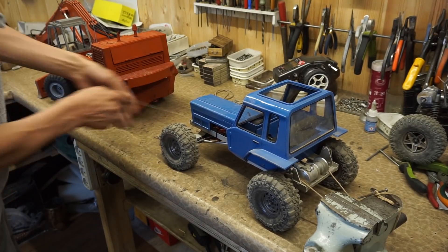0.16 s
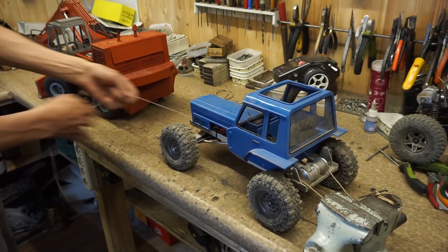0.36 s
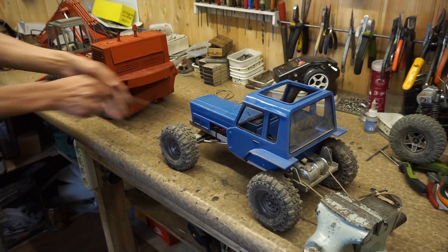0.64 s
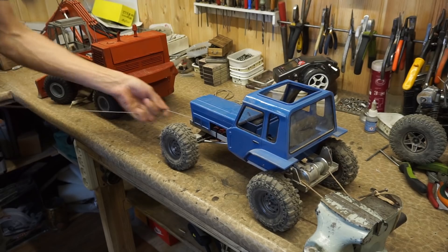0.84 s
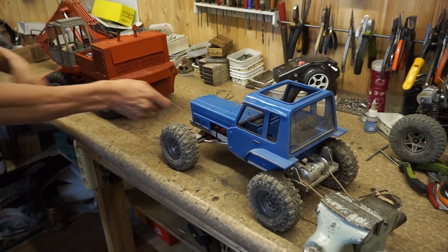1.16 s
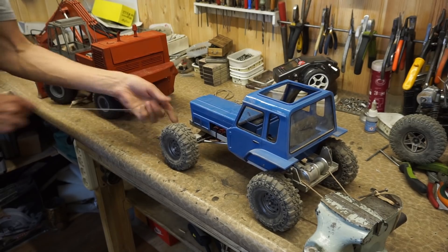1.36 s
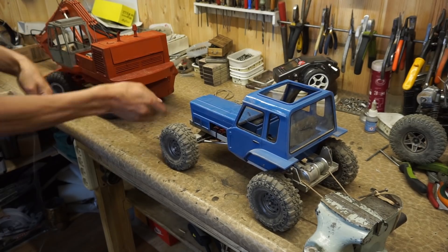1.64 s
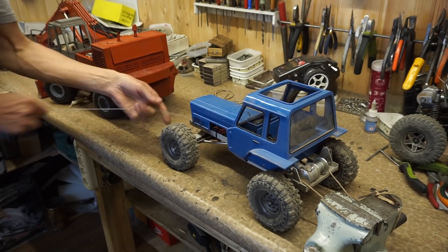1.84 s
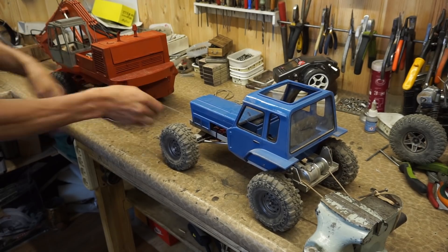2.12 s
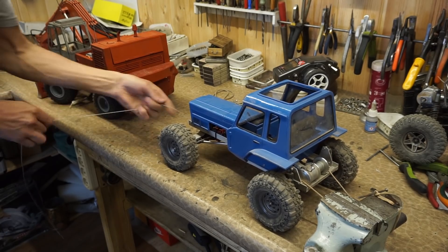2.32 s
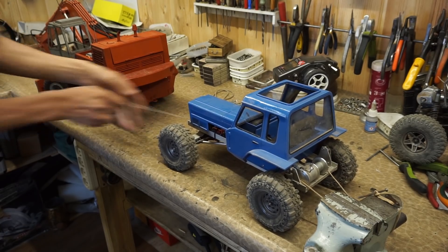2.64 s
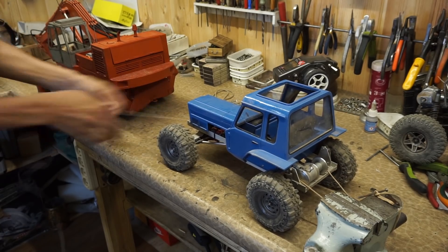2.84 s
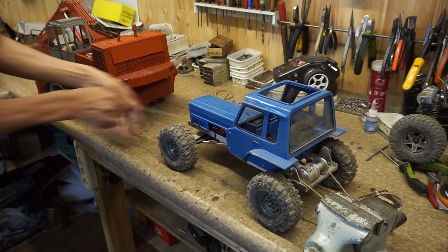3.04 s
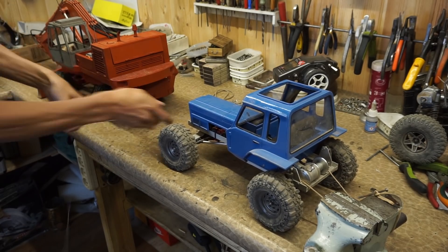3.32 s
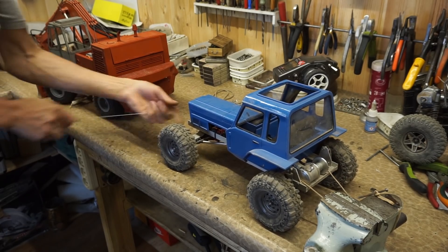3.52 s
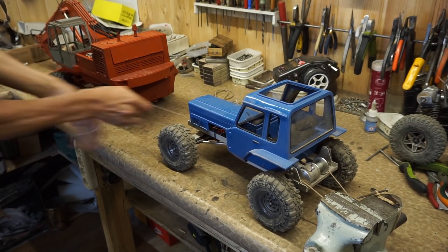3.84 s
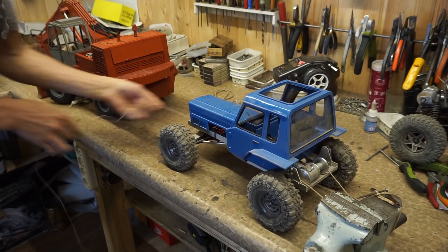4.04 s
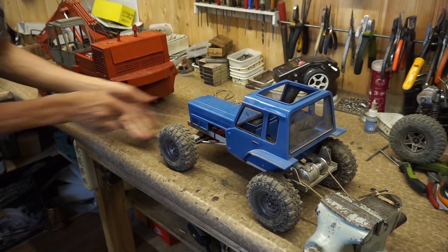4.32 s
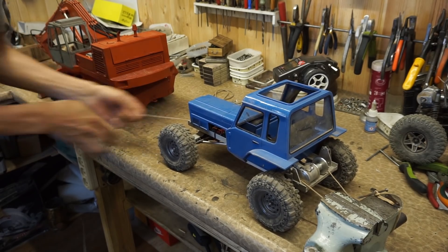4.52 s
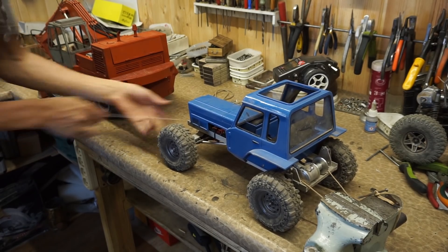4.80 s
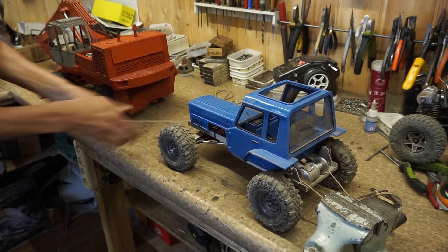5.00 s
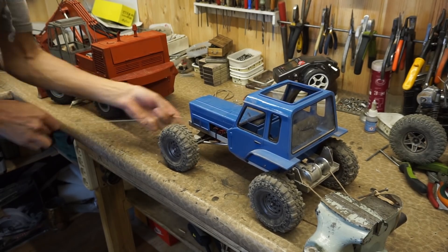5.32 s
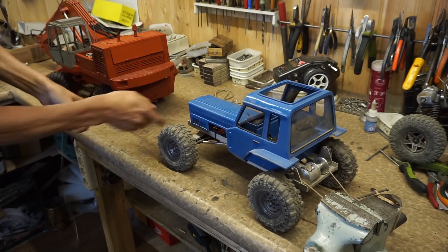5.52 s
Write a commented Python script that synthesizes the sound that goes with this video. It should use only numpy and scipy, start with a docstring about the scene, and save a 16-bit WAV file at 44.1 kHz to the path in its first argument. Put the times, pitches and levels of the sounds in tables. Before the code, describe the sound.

On a workbench in a small, quiet workshop, string is hauled hand over hand off the free-spinning drum of a model tractor's winch. From 0 to 1 s the pulls are hesitant and uneven: short, light rattles, two small ticks near 0.6 s, a faint hiss of string through fingers and thin high squeals around 0.8 s. From about 1 s the tugs get stronger and settle into a quick rhythm, roughly five a second, each a gritty whirr of bearing chatter, hollow chassis rattle, bright ringing metal and dry line rasp, cut off sharply with small gaps. Another brief squeal comes near 1.9 s. Metallic knocks stand out around 2.1, 2.3, 3.3, 4.2 and 5.2 s. The bursts are loudest from about 3.5 s on, with an especially ringing jerk near 4.15 s, continuing until about 5.6 s, where a weaker pull ends it. Little bass, close stereo, short room reflections, barely audible air.

```python
"""A toy winch on a workbench: string is hauled hand over hand off the free-spooling drum of a model tractor.
Each pull spins the drum, which chatters in its bearings: the chassis rattles, the metal drum rings
and the line rasps through its guide. Hard knocks stand out, and the axle squeals on two sharp pulls.
A small workshop answers behind a faint bed of still air. A microphone pair hears it,
with the treble scattered differently to each side."""
import sys
import numpy as np
from scipy import signal
from scipy.fft import rfft, irfft, next_fast_len
from scipy.io import wavfile
from scipy.ndimage import uniform_filter1d

SR = 44100
rng = np.random.default_rng(int(sys.argv[2]) if len(sys.argv) > 2 else 0)


def wrap_up_sound(samples):
    """Save the sound to the file named by the first command line argument, as 16-bit audio."""
    columns = np.atleast_2d(samples).T
    # keep every value between -1 and 1, then stretch to whole-number steps
    tamed = np.clip(columns, -1, 1)
    steps = np.round(tamed * 32767).astype(np.int16)
    wavfile.write(sys.argv[1], SR, steps)


N = 249606  # samples

# Levels in the tables stand at the source, ahead of the room, unless said otherwise.
# Still air of the place, spectrum only: pitch_hz, relative density_db
AIR_SPECTRUM = [(20, -5), (90, -2.5), (150, -12), (300, 2.5), (1000, -3), (5000, -19), (15000, -32)]
# Time the workshop takes to fall by 60 dB: pitch_hz, t60_s
ROOM_DECAY = [(200, .28), (1000, .3), (4000, .3), (13000, .27), (15000, .08)]
# Workshop reflections against the direct sound: pitch_hz, level_db
ROOM_LEVEL = [(200, -19.5), (700, -7), (1400, -8), (2400, -5.5), (4000, -7.5), (13500, -7.5), (15200, -8)]
# Microphone pair, left minus right: pitch_hz, difference_db
STEREO_TILT = [(60, 2), (110, 3), (200, -1), (380, 0.5), (700, -2.5), (1290, -3), (2380, -3.5),
               (4400, -4.5), (8120, -2.5), (15000, 0)]
# Microphone pair, likeness of left and right: pitch_hz, likeness (1 = the same)
STEREO_LIKENESS = [(300, 0.98), (1400, 0.97), (1800, 0.38), (2400, 1), (3000, 0.2), (4000, 0.023),
                   (6400, 0.11), (8000, 0.087), (14000, 0.055)]
# String slipping through the fingers: start_s, length_s, level_db
FINGER_SLIPS = [(.485, 0.057, -49), (0.754, 0.22, -47.5), (1.834, 0.073, -50)]
# Thin hiss of a slip: pitch_hz, relative density_db
SLIP_SPECTRUM = [(3000, -32), (6000, -6), (9000, -1), (13500, -2), (15500, -8)]
# Axle squeals: start_s, length_s, level_db of each main tone, whistle_db
AXLE_SQUEALS = [(0.76, 0.032, -32.5, -35), (0.787, 0.034, -35.5, -56), (0.823, 0.036, -33.5, -41),
                (1.868, 0.034, -32, -40)]
# Sharp knocks of the drum against its play: start_s, tick_db, ring_db
DRUM_KNOCKS = [(.5711, -4, -11), (.5773, -5.5, -11), (.5917, -13, -18), (2.0605, -7, -9), (2.2795, -6, -6),
               (3.2655, -13, -5), (3.2875, -9, -2), (4.1585, -8, -4), (5.2175, -11, -8)]
# Dry tick of a knock: pitch_hz, relative density_db
TICK_SPECTRUM = [(200, -35), (900, -11), (1900, -4), (2600, 4), (3300, 6), (4500, -3), (7000, -10),
                 (11000, -19), (15000, -38)]
# Hand-over-hand pulls, hesitant at first: start_s, let_go_s, spin_up_s, rattle_db of the chassis,
# swell_db over the pull, ring_db of the drum over the rattle, rasp_db of the line over the rattle
HAND_PULLS = [(-0.029, 0.043, 0.024, -41.5, 8.0, -7, -4.5), (0.133, 0.333, 0.052, -38, 3, -3, -5.5),
              (0.392, 0.439, 0.038, -36.5, -1.0, -3, -4.5), (0.471, 0.603, 0.037, -37.0, -12.0, -0.5, -3.5),
              (0.611, 0.697, 0.019, -39.5, 5, -1.0, -5.5), (0.711, 0.884, 0.028, -34.5, 0.0, -3, -2.5),
              (0.932, 0.971, 0.013, -35.0, 0.5, -1.5, -5), (0.979, 1.163, 0.051, -33.5, 0.5, 0.5, -5),
              (1.23, 1.261, 0.034, -31.5, -6, -2, -6), (1.276, 1.437, 0.023, -31.0, 1.5, 1.5, -5),
              (1.489, 1.686, 0.024, -33.0, 1.0, -0.5, -5.0), (1.759, 1.923, 0.027, -32.0, 4.0, 0.0, -6),
              (1.968, 2.113, 0.021, -30.0, 7.5, -2.5, -4.0), (2.217, 2.366, 0.03, -30.0, 3.0, 1.5, -5.5),
              (2.424, 2.568, 0.032, -31.0, 0, 0.5, -4.5), (2.644, 2.788, 0.034, -30, 1.5, -0.5, -5),
              (2.842, 2.966, 0.031, -30.0, -6.5, 3.5, -2.5), (3.03, 3.195, 0.023, -32.5, 6.5, 0, -4.5),
              (3.255, 3.39, 0.016, -29.5, 1.5, 0.5, -5.5), (3.472, 3.6, 0.044, -29.5, 2, 1.0, -6.0),
              (3.662, 3.814, 0.029, -28, 1.0, -1, -6.0), (3.877, 4.034, 0.025, -30.5, 3.0, 1.0, -4.0),
              (4.084, 4.232, 0.043, -26.5, -4.0, 0.5, -4.0), (4.327, 4.47, 0.038, -30, -4.5, -0.5, -6.0),
              (4.52, 4.687, 0.022, -30.5, 0.5, 0, -6), (4.762, 4.913, 0.027, -31.0, 5.5, 1, -4),
              (4.963, 5.12, 0.032, -29.0, 2, 3.5, -2.5), (5.206, 5.369, 0.041, -28.0, -4.5, 1, -5.0),
              (5.407, 5.574, 0.055, -28.0, -6.5, 1.5, -5.5), (5.636, 5.7, 0.026, -39.5, -2.5, -2, -4.5)]
# Jerks of the line that set the drum whirring: start_s, length_s, ring_db of the drum, rasp_db of the line
LINE_JERKS = [(0.261, 0.032, -28.5, -38), (0.402, 0.031, -36.5, -55), (0.748, 0.039, -24.5, -30),
              (0.825, 0.042, -35, -33), (1.131, 0.028, -41.5, -35.0), (1.299, 0.021, -31, -46),
              (1.575, 0.046, -27.5, -42), (1.854, 0.042, -24.5, -31.5), (1.981, 0.038, -24.5, -36.5),
              (2.24, 0.069, -24.5, -34), (2.742, 0.014, -23, -45.0), (2.86, 0.034, -22, -34.0),
              (3.122, 0.03, -28.5, -33.5), (3.281, 0.018, -27, -38), (3.517, 0.041, -34.0, -29.0),
              (3.552, 0.028, -24.5, -35), (3.984, 0.041, -25, -46.0), (4.148, 0.059, -19.5, -33.0),
              (4.395, 0.048, -30, -33.5), (4.62, 0.025, -25, -44.5), (4.831, 0.061, -24, -32),
              (5.328, 0.011, -25, -41.0)]
# String in its guide: pitch_hz, relative density_db
RASP_SPECTRUM = [(400, -57), (1800, 0), (2900, 4.5), (3600, 1.5), (4200, 0.5), (5500, 0), (6500, -4),
                 (7100, -4.5), (8800, -5), (10500, -9), (12300, -12), (13600, -14.5), (14300, -13),
                 (15500, -46)]
# Modes of the metal line guide: pitch_hz, width_hz, relative level_db
GUIDE_MODES = [(6387, 176, 1), (6466, 115, 4.5), (6537, 340, -6.5)]
# Modes of the metal drum and its frame: pitch_hz, width_hz, relative level_db
DRUM_MODES = [(2245, 95, -11), (2371, 42.4, 1), (2415.4, 40, 0), (2435, 55, -3.5), (2562, 29, -2.5),
              (2622, 88, -14), (2855, 36, -10), (3003, 69, -18.5), (3220, 33, -20.5), (3730, 23, -34.5),
              (4580, 89, -22)]
# Clear modes of chassis and body shell: pitch_hz, width_hz, relative level_db
CHASSIS_MODES = [(233, 11, -21), (400, 31, -13.5), (523.6, 31, -3.5), (585.7, 18.5, 3.5),
                 (663.6, 20.5, 3.5), (699.4, 26.5, 2), (830.7, 36.6, 1.5), (871.6, 36.5, 2), (929.4, 25, 1),
                 (984, 20.5, -2.5), (1057.6, 37.6, 2), (1220, 48.4, 0.5), (1315, 18, 3),
                 (1394.5, 24.4, 2.5), (1528, 44, -6.5), (1785, 43, -4), (1932, 31, -2)]
# The crowd of weaker chassis modes: pitch_hz, relative density_db
CLATTER_SPECTRUM = [(60, -48), (180, -31), (230, -29.5), (310, -29), (450, -16.5), (560, -4), (800, 1),
                    (1350, -2), (1600, -1), (2100, -1.5), (3000, -1.5), (4000, -13), (8000, -53.5)]

AIR_DB = -77.5
EDGE_HZ = 15750  # upper limit of the recorder
SQUEAL_HZ, WHISTLE_HZ = [7555, 7678], 15475
# The drum at full speed, and how far its load wobbles either way
TURNS_PER_S, WOBBLE_DB = 110, 1.3
# How fast each sound dies once the hand lets go
RATTLE_COAST_DB_PER_S, RING_COAST_DB_PER_S, RASP_COAST_DB_PER_S = 294.5, 650, 470
JERK_RATTLE_DB = -2.5  # chassis rattle over line rasp in a jerk
# Coils of string catch at random: mean rate, jump in tension, time constant of the settling
CATCHES_PER_S, CATCH_DB, CATCH_SETTLE_S = 45, 1.14, .012
SLACK_DB = -61  # faint rasp of a line that never lies quite still


def from_db(db):
    """Decibels to gain."""
    return 10 ** (np.asarray(db) / 20)


def unit(x):
    """Scales to an rms of one."""
    return x / np.sqrt(np.mean(x ** 2) + 1e-20)


def steadied(x, steady_s):
    """Holds the running power near one."""
    width = max(int(steady_s * SR), 2)
    power = uniform_filter1d(x ** 2, width)
    return x / np.sqrt(abs(power) + 1e-9)


def read(points, hz):
    """Reads a table along a log-frequency axis."""
    f, value = np.transpose(points)
    return np.interp(np.log(hz + 1), np.log(f + 1), value)


def add(mix, start_s, sound):
    """Mixes a sound in at start_s."""
    part = mix[max(round(start_s * SR), 0):][:len(sound)]
    part += sound[:len(part)]


def convolve(x, response):
    """Passes a sound through a response, cut to the length of the scene."""
    return signal.oaconvolve(x, response)[:N]


def colour(points, size=4096):
    """Causal (minimum-phase) impulse response of unit energy with the given spectrum."""
    hz = abs(np.fft.fftfreq(size, 1 / SR))
    log_gain = np.log(from_db(read(points, hz)))
    spectrum = np.exp(np.conj(signal.hilbert(log_gain)))
    response = np.fft.ifft(spectrum).real[:size // 2]
    return response / np.linalg.norm(response)


def ringing(modes, size=8192):
    """Impulse response of unit energy: one dying sine a mode, neighbours in opposite sense."""
    t = np.arange(size) / SR
    response = np.zeros(size)
    for k, (hz, width_hz, db) in enumerate(modes):
        decay = np.exp(-np.pi * width_hz * t)  # a wide mode dies fast
        response += (-1) ** k * from_db(db) * width_hz * decay * np.sin(2 * np.pi * hz * t)
    return response / np.linalg.norm(response)


def contacts(per_s, spread_db, rub, steady_s):
    """Clicks of uneven size at a changing rate over a smooth rub; their running power is near one."""
    struck = rng.random(N) < per_s / SR
    size_db = spread_db * np.clip(rng.standard_normal(N), -2, 2)
    sign = rng.choice([-1, 1], N)
    clicks = struck * sign * from_db(size_db)
    return steadied(unit(clicks) + rub * rng.standard_normal(N), steady_s)


def still_air():
    """Steady coloured noise of the place: part shared by both microphones, part separate in each."""
    shared, left, right = (convolve(rng.standard_normal(N), colour(AIR_SPECTRUM)) for _ in range(3))
    return from_db(AIR_DB) * (shared + 1.2 * np.array([left, right]))


def scatter(t60_points, size=16384):
    """Sparse reflections of random sign, each band dying at its own speed; gain one in every band."""
    taps = rng.choice([-1., 1.], size) * (rng.random(size) < .15)
    hz, t, bands = signal.stft(unit(taps), SR, nperseg=256)
    decay = from_db(-60 * t / read(t60_points, hz)[:, None])
    decay /= np.sqrt((decay ** 2).sum(1, keepdims=True) * (t[1] * SR))
    return signal.istft(bands * decay, SR, nperseg=256)[1][:size]


def reflect(x, t60_points, count=3):
    """The moving arms keep changing the paths: the sound fades from one set of reflections to the next."""
    sweep = 2 * np.pi * 2.25 * np.arange(N) / SR
    out = 0
    for k in range(count):
        share = np.sqrt(2 / count) * np.cos(sweep + np.pi * k / count)  # the shares' powers sum to one
        out = out + convolve(x * share, scatter(t60_points))
    return out


def workshop(x):
    """The bench scatters the treble differently to each side; walls add a short, later tail."""
    size = next_fast_len(N + 4096)
    hz = np.fft.rfftfreq(size, 1 / SR)
    same = np.clip(read(STEREO_LIKENESS, hz), -1, 1)
    wet, tilt_db = from_db(read(ROOM_LEVEL, hz)), read(STEREO_TILT, hz)
    bench = reflect(x, [(200, 0.023), (8000, 0.041)])  # pitch_hz, t60_s
    side = rfft(bench, size) * np.sqrt((1 - same) / 2)
    mid = rfft(x, size) * np.sqrt((1 + same) / 2)
    out = []
    for sense in (1, -1):  # left, right
        late = np.pad(reflect(x, ROOM_DECAY), (int(.005 * SR), 0))  # 5 ms later
        heard = mid + sense * side + wet * rfft(late, size)
        out.append(irfft(heard * from_db(sense * tilt_db / 2), size)[:N])
    return np.array(out)


def slips():
    """String sliding over skin hisses high above the rasp."""
    level = np.zeros(N)
    for start_s, length_s, db in FINGER_SLIPS:
        add(level, start_s, from_db(db) * signal.windows.tukey(int(length_s * SR), .5))
    return convolve(level * rng.standard_normal(N), colour(SLIP_SPECTRUM))


def squeals():
    """The dry axle sings unsteadily on a close pair of modes, with a thin whistle above."""
    out = np.zeros(N)
    for start_s, length_s, db, whistle_db in AXLE_SQUEALS:
        count = int(length_s * SR)
        swell = signal.windows.tukey(count, .5)
        for hz, level_db in zip(SQUEAL_HZ + [WHISTLE_HZ], [db, db, whistle_db]):
            wander = unit(uniform_filter1d(rng.standard_normal(SR), 80))[:count]
            tone = np.sin(2 * np.pi * np.cumsum(hz * (1 + 0.0066 * wander)) / SR)
            add(out, start_s, from_db(level_db) * tone * swell)
    return out


def knocks():
    """Single hard blows: a dry tick and the ring of the drum."""
    out, tick, ring = np.zeros(N), colour(TICK_SPECTRUM), ringing(DRUM_MODES)
    for start_s, tick_db, ring_db in DRUM_KNOCKS:
        add(out, start_s, from_db(tick_db) * tick)
        add(out, start_s, from_db(ring_db) * ring)
    return out


def jerking(levels_db):
    """Level of one sound through all jerks: each swells and ends within a few hundredths of a second."""
    power = np.zeros(N)
    for (start_s, length_s, *_), db in zip(LINE_JERKS, levels_db):
        swell = from_db(db) * signal.windows.tukey(int(length_s * SR), .4)
        add(power, start_s, swell ** 2)
    return np.sqrt(power)


def pulling(over_db, coast_db_per_s):
    """Level of one sound through all pulls: the drum spins up, follows the hand, then coasts down."""
    t, power = np.arange(N) / SR, np.zeros(N)
    for (start, let_go, spin_up, db, swell_db, *_), extra_db in zip(HAND_PULLS, over_db):
        span = (t > start) & (t < let_go + .3)
        since = t[span] - start
        attack = np.minimum(since / max(spin_up, 1 / SR), 1)
        progress = np.minimum(since / max(let_go - start, 1 / SR), 1)
        hold_db = swell_db * (progress - .5)
        coast_db = coast_db_per_s * np.maximum(t[span] - let_go, 0)
        power[span] += (attack * from_db(db + extra_db + hold_db - coast_db)) ** 2
    return np.sqrt(power)


def catches():
    """Tension of the line: it jumps when a coil catches, then settles."""
    caught = rng.random(N) < CATCHES_PER_S / SR
    settle = np.exp(-np.arange(4096) / SR / max(CATCH_SETTLE_S, 1 / SR))
    pile_up = np.minimum(convolve(caught * 1., settle), 2)  # at most two catches' worth
    return unit(from_db(CATCH_DB * pile_up))


def flutter(speed, turns_per_s, depth_db):
    """The loose drum bears harder on its axle once in every uneven turn."""
    wander = unit(uniform_filter1d(rng.standard_normal(N), 900))
    turns = np.cumsum(turns_per_s * speed * (1 + 0.2755 * wander)) / SR
    return unit(from_db(depth_db * np.sin(2 * np.pi * turns)))


def line(level, speed):
    """Fibres of the string catch and slip in the guide, which rings thinly."""
    fibres = contacts(3000 * speed, spread_db=0.0, rub=1.0, steady_s=0.05)
    rasp = convolve(level * fibres, colour(RASP_SPECTRUM))
    snags = contacts(400 * speed, spread_db=3.5, rub=0.3, steady_s=0.11)
    zing = convolve(level * snags, ringing(GUIDE_MODES))
    return from_db(1) * rasp + from_db(-4.5) * zing


def drum(level, speed):
    """The drum knocks on its axle and rings; its play limits the swing."""
    blows = contacts(550 * speed, spread_db=1.0, rub=0.82, steady_s=0.023)
    metal = convolve(blows, ringing(DRUM_MODES))
    return from_db(0.05) * level * steadied(metal, steady_s=0.025)


def chassis(level, speed):
    """Bearing chatter shakes the chassis: clear low modes and a dense clatter."""
    chatter = contacts(1600 * speed, spread_db=1.0, rub=0.5, steady_s=0.022)
    shell = steadied(convolve(chatter, ringing(CHASSIS_MODES)), steady_s=.04)
    loose = contacts(1300 * speed, spread_db=3.0, rub=0.47, steady_s=0.019)
    clatter = convolve(level * loose, colour(CLATTER_SPECTRUM))
    return from_db(-1.08) * level * shell + from_db(-2.5) * clatter


def winch():
    """Pulls and jerks drive chassis, drum and line together, all following one drum speed."""
    *_, ring_db, rasp_db = np.transpose(HAND_PULLS)
    *_, jerk_ring_db, jerk_rasp_db = np.transpose(LINE_JERKS)
    pull_rattle = pulling(np.zeros(len(HAND_PULLS)), RATTLE_COAST_DB_PER_S)
    rattle = np.hypot(pull_rattle, jerking(jerk_rasp_db + JERK_RATTLE_DB))
    ring = np.hypot(pulling(ring_db, RING_COAST_DB_PER_S), jerking(jerk_ring_db))
    rasp = np.hypot(pulling(rasp_db, RASP_COAST_DB_PER_S), jerking(jerk_rasp_db))
    rasp = np.hypot(rasp, from_db(SLACK_DB))
    speed = np.sqrt(rattle / rattle.max())  # a faster drum rattles louder; 1 is full speed
    load, tension = flutter(speed, TURNS_PER_S, WOBBLE_DB), catches()
    body = chassis(rattle * load, speed)
    return body + drum(ring * load * tension, speed) + line(rasp * load * tension, speed)


def scene():
    """The winch with its knocks, squeals and slips, in the quiet air of the workshop."""
    bench_sound = winch() + knocks() + squeals() + slips()
    # so small a body radiates little bass
    bass_cut = signal.butter(4, 190, "highpass", fs=SR, output="sos")
    radiated = signal.sosfilt(bass_cut, bench_sound)
    return workshop(radiated) + still_air()


def record(dry):
    """The band limit of the recorder: a steep linear-phase low-pass on both channels."""
    low_pass = signal.firwin(1023, EDGE_HZ, window=("kaiser", 9), fs=SR)
    return signal.oaconvolve(dry, low_pass[None], "same")


dry = scene()
out = record(dry)
wrap_up_sound(out)
```